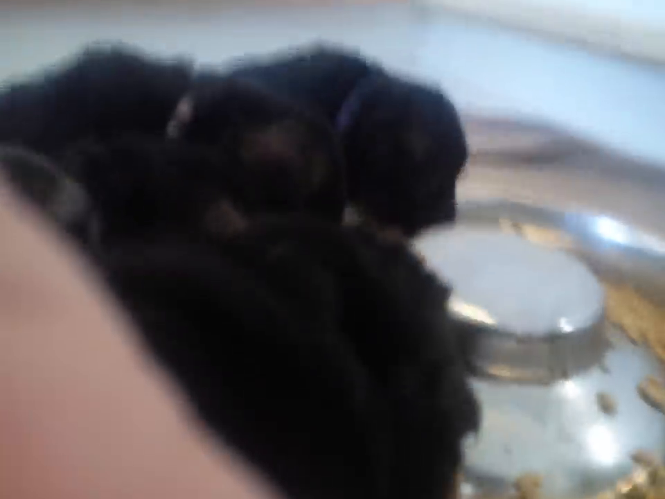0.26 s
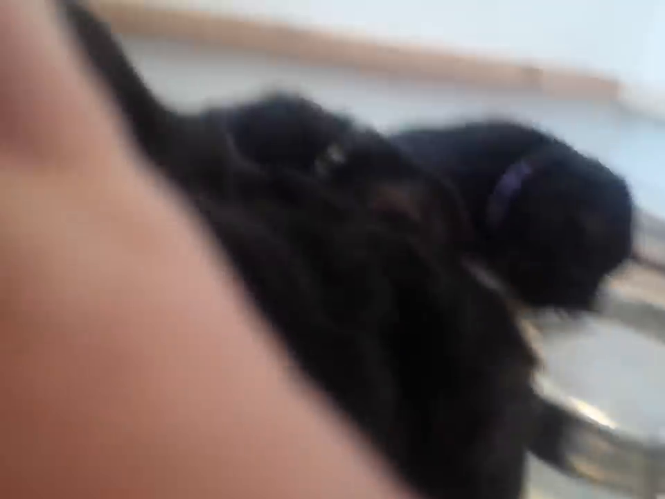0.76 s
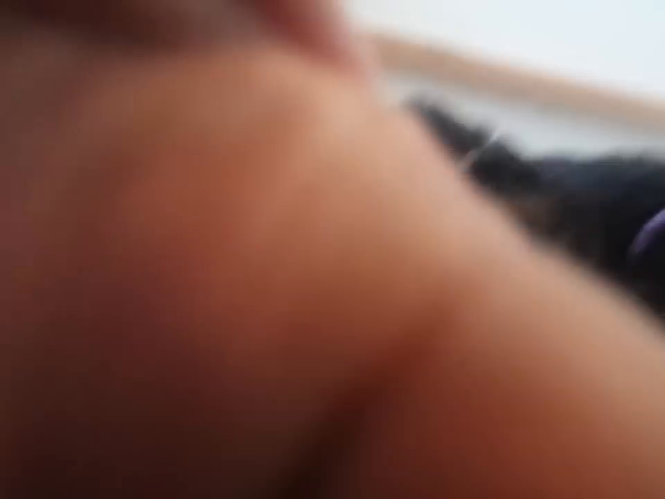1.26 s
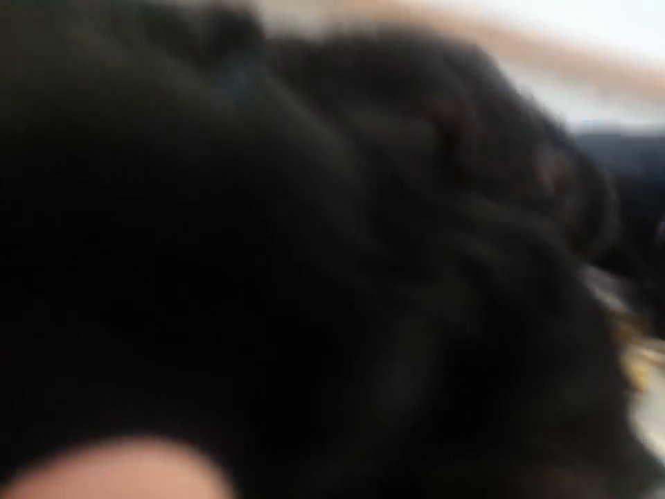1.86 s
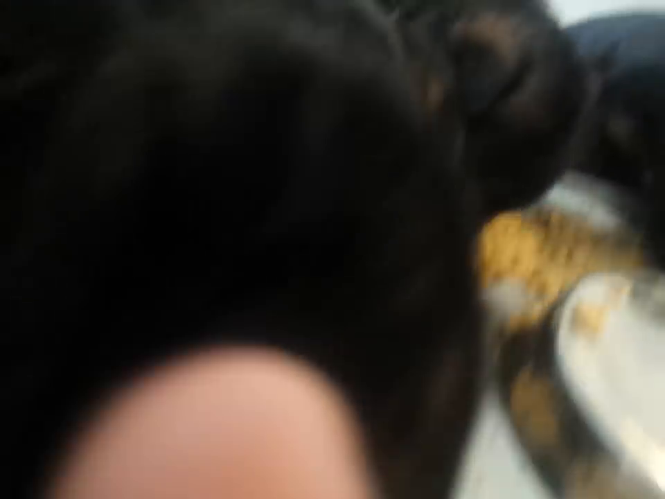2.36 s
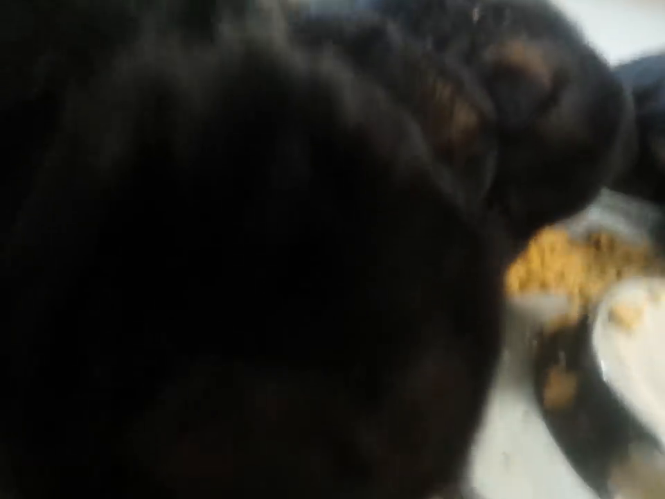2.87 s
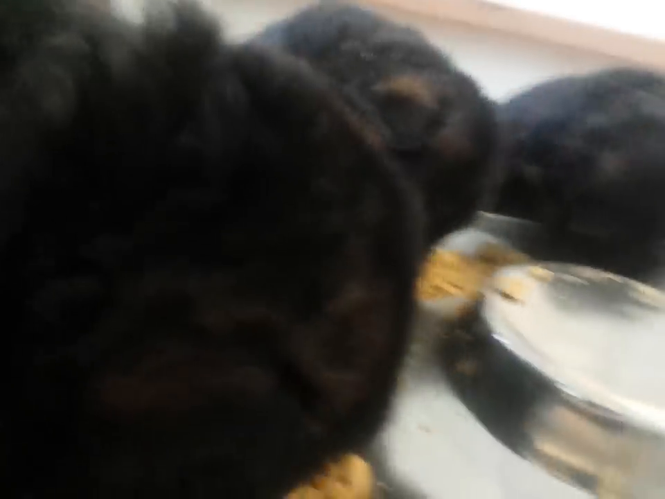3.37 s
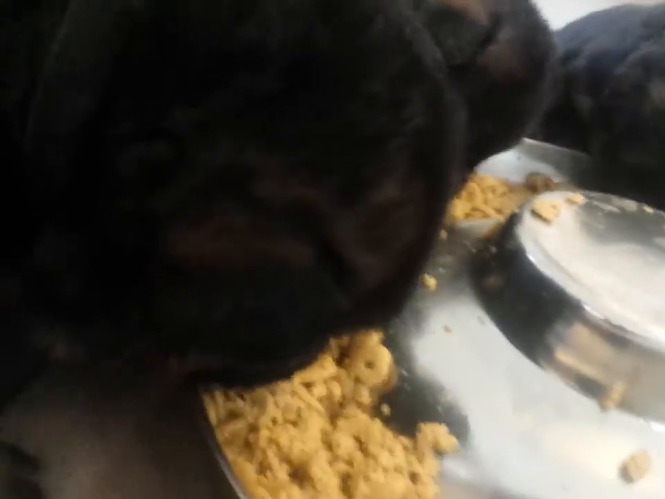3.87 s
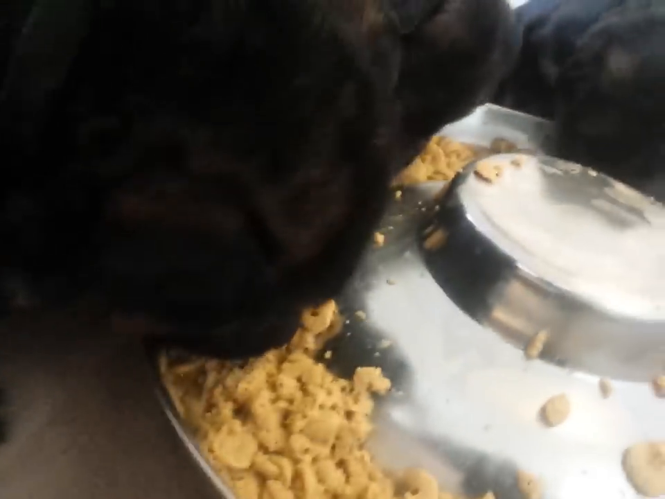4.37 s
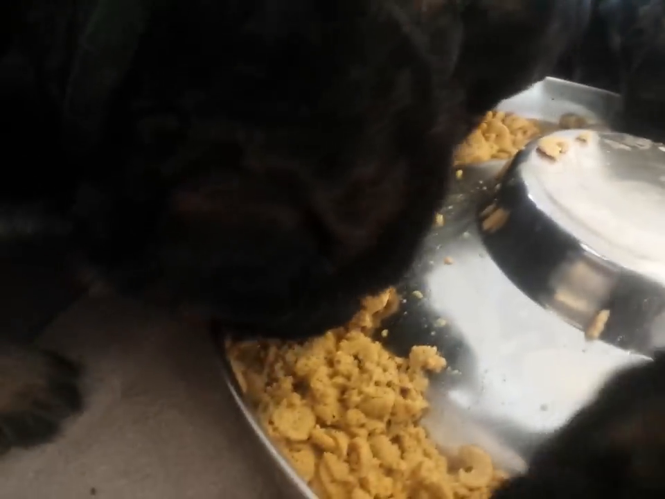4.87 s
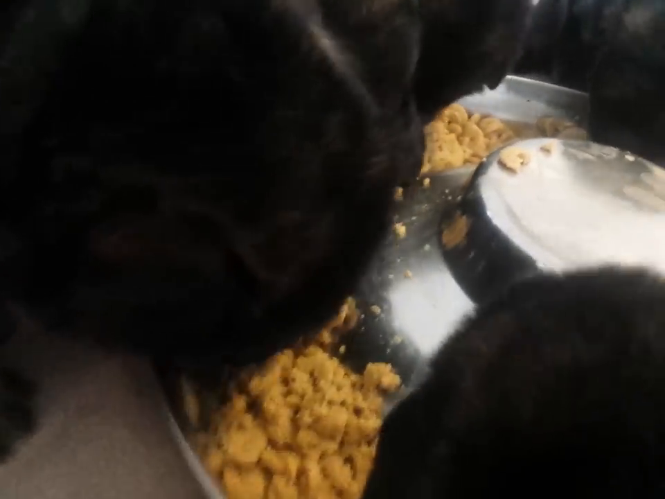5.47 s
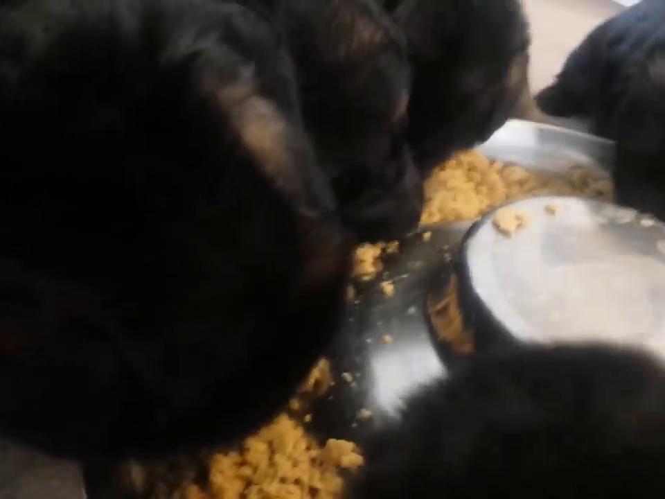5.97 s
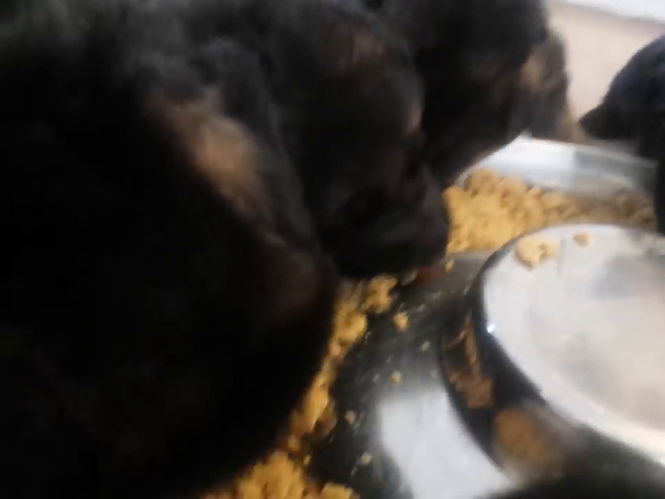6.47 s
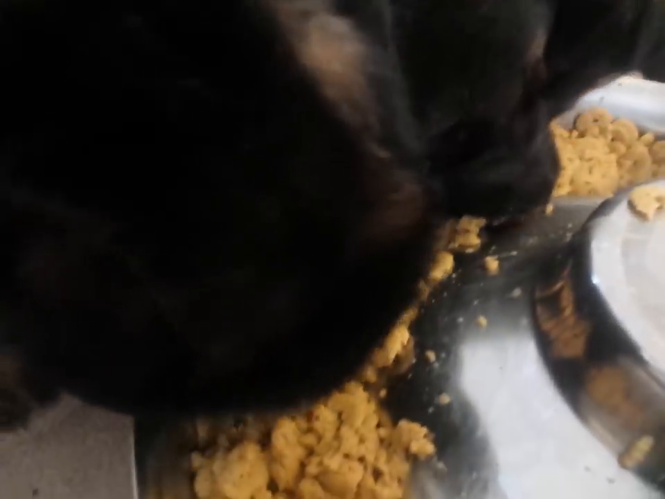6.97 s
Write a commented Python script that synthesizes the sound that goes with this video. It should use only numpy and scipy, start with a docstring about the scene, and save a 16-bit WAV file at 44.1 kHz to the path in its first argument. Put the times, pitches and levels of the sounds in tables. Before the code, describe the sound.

Close wet clicking and squelching of young dogs eating soaked kibble indoors, with fur and hand brushing the microphone and a few dull bumps.

```python
"""Wooden floor indoors, low room rumble: puppies eat soaked kibble from a steel pan near a hand-held phone.
Tongue clicks are damped rings with noise ticks; squelches are clumps of short wet pops.
Mash and a fine hiss are coloured noise with crackle; hand and fur brushing past are swelling noise strokes.
Low bumps, probably a hand knock, ring low modes. Each of two microphone ports adds its own treble resonance."""
import sys
import numpy as np
from scipy import signal
from scipy.io import wavfile
from scipy.ndimage import uniform_filter1d

SR = 44100
rng = np.random.default_rng(int(sys.argv[2]) if len(sys.argv) > 2 else 0)


def transcribe(u):
    """Save the signal u as a 16-bit wav file named by the first command-line argument.

    u: samples, shape (n,) or (channels, n), limited to [-1, 1]; the rate is SR.
    q: integer samples, one column per channel.
    """
    v = np.clip(np.atleast_2d(u).T, -1, 1)
    q = np.round(v * 32767).astype(np.int16)
    wavfile.write(sys.argv[1], SR, q)


N = 318843


def gain_of(db):
    """Decibels to amplitude gain."""
    return 10 ** (np.asarray(db) / 20)


def evened(x):
    """Scales to rms 1."""
    return x / np.sqrt(np.mean(x ** 2) + 1e-20)


def read(points, hz):
    """Interpolates a spectrum on a log frequency axis."""
    point_hz, value = np.transpose(points)
    return np.interp(np.log(hz + 1), np.log(point_hz + 1), value)


def along(rows, order):
    """Interpolates one column of a time curve at every sample."""
    rows = np.asarray(rows)
    return np.interp(np.arange(N) / SR, rows[:, 0], rows[:, order])


def add(mix, start_s, sound):
    """Adds a stereo sound at a time, cut at the end of the mix."""
    part = mix[:, max(round(start_s * SR), 0):][:, :sound.shape[1]]
    part += sound[:, :part.shape[1]]


# left-right likeness of noise: (frequency [Hz], correlation [0-1])
PORT_LIKENESS = [(30, .45), (125, .75), (250, .75), (600, .55), (1200, .1), (8000, 0)]


def noise(tone, size, patchy_db):
    """Coloured stereo noise, rms 1, with patches drifting in time and pitch; lows are shared by the ports."""
    frames = N // (size // 4) + 5
    hz = np.fft.rfftfreq(size, 1 / SR)
    a, b, c, d, patches = rng.standard_normal((frames, len(hz), 5)).T
    patches = uniform_filter1d(patches, size=8, axis=0)
    patches = evened(uniform_filter1d(patches, size=10, axis=1))
    same = np.clip(read(PORT_LIKENESS, hz), -1, 1)[:, None]
    left = a + 1j * b
    right = same * left + np.sqrt(1 - same ** 2) * (c + 1j * d)
    # outside the tone points the level falls off, by 90 dB at most
    below = np.maximum(tone[0][0] / (hz + 1), 1) - 1
    above = np.maximum(hz / tone[-1][0], 1) - 1
    edge_db = np.maximum(-40 * below - 40 * above, -90)
    colour_db = (read(tone, hz) + edge_db)[:, None] + patchy_db * patches
    spectra = np.array([left, right]) * gain_of(colour_db)
    return evened(signal.istft(spectra, nperseg=size, noverlap=size * 3 // 4)[1][:, :N])


def ping(hz, cycles, swell=0.11, size=400):
    """Damped ring, peak 1; decay and onset constants (cycles, swell) are in cycles of its pitch."""
    turns = np.arange(size) / SR * hz
    ring = np.sin(2 * np.pi * turns) * np.exp(-turns / cycles) * (1 - np.exp(-turns / swell))
    return ring / abs(ring).max()


def crackle(lo_hz, hi_hz, per_s, cycles, spread_db, count=12):
    """Small wet pops on a ladder of pitches, at random times, sizes and sides; rms 1."""
    out = np.zeros((2, N))
    for hz in np.geomspace(lo_hz, hi_hz, count):
        when, size, sign, side = rng.random((int(per_s / count * N / SR), 4)).T
        height = np.sign(sign - .5) * gain_of(-spread_db * np.log(size + 0.022))
        train = np.zeros((2, N))
        train[:, (when * N).astype(int)] = height * np.array([side, 1 - side])
        pop = signal.oaconvolve(train, ping(hz, cycles)[None], axes=1)[:, :N]
        lag = rng.integers(-12, 13)  # samples: the ports lie a few cm apart
        out += [pop[0], np.roll(pop[1], lag)]
    return evened(out)


# low room rumble, dipping after the loud click: (time [s], rms level [dB])
RUMBLE_LEVEL = [(0, -52.5), (1.4, -48.5), (1.83, -50.5), (3.15, -50), (3.3, -53), (3.9, -59.5), (4.3, -53),
                (5.1, -51), (5.45, -45.5), (6., -51), (7.23, -51.5)]
# room resonances: (frequency [Hz], relative level [dB per Hz])
RUMBLE_COLOUR = [(25, -26), (37, -16), (75, -7), (98, -6), (114, 4), (130, -20), (156, -3.5), (227, -2.5),
                 (340, -13), (377, -9), (509, -29.5), (687, -19.5), (900, -23.5), (1200, -47)]


def rumble():
    """Low noise in the resonances of the room."""
    return gain_of(along(RUMBLE_LEVEL, order=1)) * noise(RUMBLE_COLOUR, size=4096, patchy_db=1.2)


# low bumps: (time [s], level of the peak-normalised ring before the rise [dB],
# rise [s], t60 at 100 Hz [s], favoured pitch [Hz], loss away from it [dB per octave])
BUMPS = [(0.3083, -14.5, 0.0024, 0.19, 236, 5.5), (.338, -25.5, 0.0046, 0.5, 112, 6),
         (3.621, -23.5, 0.0033, 0.043, 330, 12), (5.582, -16, 0.0073, 0.16, 172, 38),
         (5.6, -32, 0.008, 0.31, 80, 19)]
# low modes: (frequency [Hz], relative level [dB])
BUMP_MODES = [(58, 9), (102, 8.5), (140, 6.5), (172, 6), (330, 4.5), (480, 4), (680, 6.5), (900, -4)]
FAR_PORT_GAIN = .88  # ring at the right port


def bumps():
    """A soft knock rings low modes, the higher dying first; rough handling noise, independent per port."""
    out, t = np.zeros((2, N)), np.arange(SR // 2) / SR
    rough_band = signal.butter(1, [90, 600], "band", fs=SR)
    roughs = signal.lfilter(*rough_band, rng.standard_normal((len(BUMPS), 2, len(t))))
    for (start_s, db, rise_s, t60_s, knock_hz, narrow_db), rough in zip(BUMPS, roughs):
        ring = np.zeros(len(t))
        for hz, mode_db in BUMP_MODES:
            struck_db = mode_db - narrow_db * abs(np.log2(hz / knock_hz))
            decay_db = 60 * t / t60_s * (hz / 100) ** 0.53
            ring -= gain_of(struck_db - decay_db) * np.sin(2 * np.pi * hz * t)
        both = np.array([ring, FAR_PORT_GAIN * np.roll(ring, 22)]) / abs(ring).max()  # right 0.5 ms later
        both += gain_of(-16.0 - narrow_db - 70 * t / t60_s) * evened(rough)
        onset = 1 - np.exp(-(t / rise_s) ** 2)
        add(out, start_s, gain_of(db) * onset * both)
    return out


# strokes of skin and fur near the ports: (loudest time [s], length [s],
# left level [dB], right level [dB], duller scrape level [dB])
BRUSH_STROKES = [(0.167, 0.092, -35, -44, -48.5), (0.327, 0.037, -36.5, -48, -64),
                 (0.376, 0.067, -34, -42, -49), (0.422, 0.1, -61, -43.5, -48.5),
                 (0.465, 0.12, -33.5, -53, -48), (0.673, 0.056, -59, -40, -49),
                 (0.745, 0.067, -49, -39.5, -63), (0.844, 0.13, -36, -43, -74),
                 (0.943, 0.16, -54, -43, -69), (1.036, 0.1, -62, -46.5, -53), (1.159, 0.087, -69, -39, -52),
                 (1.376, 0.17, -41, -40, -54), (1.665, 0.13, -41, -32, -51),
                 (2.002, 0.085, -50, -66, -45.5), (2.776, 0.21, -42.5, -40.5, -45),
                 (3.155, 0.29, -38.5, -40.5, -37), (3.29, 0.054, -49, -48, -50.5),
                 (3.617, 0.051, -51, -44.5, -65), (5.62, 0.36, -51, -49.5, -52.5),
                 (6.007, 0.059, -62, -47, -44.5)]
# stroke colour: (frequency [Hz], relative level [dB])
BRUSH_COLOUR = [(1500, -7.5), (3500, -7.5), (5000, 2.5), (8000, -2.5), (11000, 1), (14300, 10),
                (15100, -26)]
# scrape colour: (frequency [Hz], relative level [dB])
SCRAPE_COLOUR = [(50, 2), (120, -4), (250, 10), (500, -8), (1000, -0.5), (2000, 0), (3500, -3.5),
                 (5000, -1.5)]
RISE_SHARE = 0.58  # part of a stroke spent swelling


def brushes():
    """Hand and fur rub past the ports: noise swells and dies per stroke, with a lower scrape beneath."""
    t, level = np.arange(N) / SR, np.zeros((3, N))
    for top_s, length_s, *levels_db in BRUSH_STROKES:
        start_s, end_s = top_s - RISE_SHARE * length_s, top_s + (1 - RISE_SHARE) * length_s
        shape = np.interp(t, [start_s, top_s, end_s], [0, 1, 0])
        level += gain_of(levels_db)[:, None] * np.sin(np.pi / 2 * shape) ** 1.48
    rub = level[:2] * noise(BRUSH_COLOUR, size=256, patchy_db=2.5)
    scrape = level[2] * noise(SCRAPE_COLOUR, size=256, patchy_db=3.0)
    return rub + scrape


# slow levels of hiss and mash, also played by mash():
# (time [s], wet mash rms level [dB], fine hiss level before its trim [dB])
MASH_AND_HISS_LEVEL = [(0, -50.5, -47), (1., -52, -48), (1.55, -51, -45.5), (1.78, -55.5, -51.5),
                       (2.05, -52, -47.5), (2.45, -51, -47.5), (2.75, -49, -41), (3.0, -53, -41.5),
                       (3.3, -57.5, -44.5), (3.62, -51.5, -52), (3.7, -63, -52.5), (3.88, -61.5, -56),
                       (4., -65, -50.5), (4.4, -54, -52.5), (5., -51.5, -48), (6.6, -52.5, -48),
                       (6.95, -48, -44), (7.23, -49.5, -54)]
# hiss colour: (frequency [Hz], relative level [dB])
HISS_COLOUR = [(1000, -4), (3000, -4.5), (5000, -3.5), (8000, -5.5), (10000, -4), (12000, -2), (14300, 7),
               (15100, -24)]
HISS_TRIM_DB, SPIT_TRIM_DB = -5.0, -8.0  # spit is relative to the mash level


def fine_hiss():
    """A fine noise hiss, stronger early with the hand near; spit crackles on top, following the mash level."""
    hiss = noise(HISS_COLOUR, size=256, patchy_db=2.5)
    spit = crackle(3400, 9300, per_s=650, cycles=1.8, spread_db=5.5)
    hiss_gain = gain_of(along(MASH_AND_HISS_LEVEL, order=2) + HISS_TRIM_DB)
    spit_gain = gain_of(along(MASH_AND_HISS_LEVEL, order=1) + SPIT_TRIM_DB)
    return hiss_gain * hiss + spit_gain * spit


# mash colour: (frequency [Hz], relative level [dB])
MASH_COLOUR = [(300, -2), (500, 3.5), (720, -1.5), (1000, -3), (1700, 6), (2500, 0.5), (3500, -5),
               (6000, -6)]


def mash():
    """Tongues stir the soaked food: a soft wash with bubbles popping in it."""
    wash = noise(MASH_COLOUR, size=512, patchy_db=3.0)
    pops = crackle(700, 3600, per_s=330, cycles=2.4, spread_db=4.5)
    return gain_of(along(MASH_AND_HISS_LEVEL, order=1)) * evened(wash + gain_of(-4.5) * pops)


# mouths closing on food: (start [s], end [s], rms level [dB], centre pitch [Hz])
SQUELCH_CLUMPS = [(2.15, 2.23, -47.5, 1400), (2.368, 2.394, -52, 1860), (2.618, 2.672, -45, 1750),
                  (3.093, 3.216, -42, 4000), (3.97, 4.048, -49.5, 2820), (4.595, 4.648, -55, 4600),
                  (4.904, 4.966, -44, 3020), (5.068, 5.137, -49, 3650), (6.39, 6.428, -47, 1510),
                  (6.888, 6.907, -40, 2940), (6.981, 7.1, -53, 2560)]


def squelches():
    """Wet food squeezed in a mouth: pops about 1 ms apart, scattered in pitch, swelling and fading."""
    out = np.zeros((2, N))
    draws_per_clump = rng.random((len(SQUELCH_CLUMPS), 120, 5))
    for (start_s, end_s, db, hz), draws in zip(SQUELCH_CLUMPS, draws_per_clump):
        length_s = end_s - start_s
        clump = np.zeros((2, round(length_s * SR) + 400))
        when_s = np.cumsum(-.001 * np.log(draws[:, 0] + .01))
        for pop_s, (pitch, size, side, lag) in zip(when_s[when_s < length_s], draws[:, 1:]):
            ring = ping(hz * 2 ** (1.7 * (pitch - .5)), cycles=1.7)  # scatter 1.7 octaves wide
            arch = abs(np.sin(np.pi * pop_s / length_s)) ** .5
            pop = gain_of(-11. * size) * arch * ring
            add(clump, pop_s, np.array([side * pop, (1 - side) * np.roll(pop, int(16 * lag))]))
        add(out, start_s, gain_of(db) * evened(clump))
    return out


# clearest tongue clicks: (time [s], snap ring level [dB], snap pitch [Hz],
# mouth cavity ring peak [dB], cavity pitch [Hz], snap left minus right [dB])
TONGUE_CLICKS = [(0.1216, -24, 5060, -28.5, 2230, 6), (0.5227, -31, 6050, -59, 700, 14.5),
                 (0.5556, -33.5, 6200, -35, 2430, 10), (0.6656, -31, 6300, -40.5, 730, -0.5),
                 (1.014, -48, 5380, -38.5, 950, 6), (1.267, -50, 4500, -34, 1670, -3),
                 (1.3053, -22.5, 11200, -60, 770, -9.5), (1.5217, -55, 6960, -28.5, 1780, -13),
                 (2.114, -31.5, 5200, -37, 1640, -2), (2.1608, -52, 4000, -37, 1350, 0),
                 (2.166, -52, 4000, -38, 1800, 4), (2.176, -46, 3990, -27.5, 1610, 9),
                 (2.1864, -50, 4600, -34, 1400, -1), (2.194, -47, 5300, -29, 1750, 5),
                 (2.2119, -34, 5850, -26, 1420, 1), (2.2133, -30.5, 2730, -34, 1520, 8),
                 (2.2824, -32, 5600, -60, 1860, -1), (2.6348, -31.5, 5140, -26.5, 1250, 4),
                 (2.655, -35, 3440, -22, 2630, 5.5), (2.8437, -28.5, 5470, -40, 1000, 5.5),
                 (2.865, -38, 4560, -31.5, 2400, 0), (2.967, -28, 5630, -53, 860, -1),
                 (3.0477, -31, 5500, -31.5, 1660, 0), (3.1013, -23, 3200, -21.5, 2770, 7),
                 (3.2536, -7, 6060, -26, 2310, -6.5), (3.446, -36, 4500, -40, 1240, 10),
                 (3.4756, -27.5, 5900, -20.5, 2580, 4), (3.4756, -32, 4550, -37.5, 760, 6),
                 (3.5495, -30.5, 4700, -49, 865, 4), (3.5607, -39, 3520, -36.5, 1280, 6),
                 (3.569, -35, 6040, -60, 1500, 2.5), (3.925, -37, 5630, -46, 1270, 1),
                 (3.953, -39, 4100, -37, 1140, 5), (4.023, -35.5, 3800, -34, 1210, 3),
                 (4.073, -35, 7550, -47, 1660, -1), (4.0875, -39, 6360, -51, 1840, 3),
                 (4.1059, -36.5, 6170, -48, 1730, -1), (4.226, -37.5, 7600, -60, 1770, -9),
                 (4.487, -38, 5400, -35, 1870, 7), (4.5019, -35, 4130, -31.5, 1000, -2),
                 (4.5031, -30.5, 2650, -27, 2070, 7), (4.5366, -41, 5710, -33.5, 2310, 7),
                 (4.581, -34.5, 5300, -35, 1840, 7), (4.5998, -33.5, 6800, -52, 1500, -0.5),
                 (4.615, -32.5, 4840, -52, 1500, 8), (4.651, -29.5, 6700, -55, 1390, -1),
                 (4.67, -38, 4600, -51, 1500, 1), (4.6815, -31, 4100, -42, 880, 8),
                 (4.801, -28.5, 5760, -51, 877, -8), (4.855, -31, 7100, -62, 732, -10.5),
                 (4.8824, -33.5, 7400, -56, 2170, 0.5), (4.918, -34, 3800, -39, 1700, 7),
                 (4.9403, -36, 6060, -27, 1700, 10), (4.9767, -27, 5400, -33, 1480, 5),
                 (5.016, -29.5, 6500, -33.5, 2920, 5), (5.07, -33, 4860, -26.5, 2200, 8),
                 (5.094, -31, 4970, -43, 2200, 1.5), (5.156, -31, 6760, -60, 1500, -3.5),
                 (5.2727, -31.5, 5940, -44, 2200, 0), (5.3116, -27.5, 4830, -37, 1240, 6),
                 (5.3266, -35, 5040, -41, 1160, 1), (5.4443, -35, 4170, -44, 2000, -4.5),
                 (5.4561, -32.5, 7610, -50, 2000, 2), (5.499, -31.5, 4820, -48, 750, -4),
                 (5.5328, -35, 5060, -41, 734, -1), (5.566, -24.5, 5560, -40, 2270, -4.5),
                 (5.693, -24.5, 7060, -39.5, 800, -2.5), (5.832, -31, 5540, -57, 1500, -1.5),
                 (5.895, -33.5, 4460, -38, 750, -8.5), (6.061, -28.5, 5400, -53, 1810, -1),
                 (6.0836, -26.5, 4900, -43, 764, -3), (6.1665, -30, 5230, -36.5, 1820, -0.5),
                 (6.364, -26, 8440, -60, 1730, 2), (6.405, -40, 2190, -39, 720, 4),
                 (6.563, -24.5, 6760, -30.5, 1980, 4), (6.6372, -31, 5550, -55, 2380, 4),
                 (6.6463, -26, 4170, -53, 3034, -1), (6.7117, -27, 5550, -37.5, 1770, -1),
                 (6.7768, -36, 4540, -35, 880, 5), (6.88, -26.5, 5600, -33.5, 1940, -1.5),
                 (6.887, -25.5, 6860, -31, 2500, 0.5), (6.892, -29, 4270, -34, 1300, -2),
                 (6.9094, -19, 3860, -29.5, 1170, -2), (6.9554, -36, 5010, -30, 1840, -7),
                 (6.96, -33, 4500, -30, 1910, -4), (7.0814, -29, 4500, -40, 2190, 0),
                 (7.12, -32, 3300, -42, 2990, 6), (7.1579, -25.5, 5330, -36, 3620, 2),
                 (7.1668, -26.5, 4150, -50, 2600, 2), (7.198, -28, 5640, -34, 2420, 1),
                 (7.2173, -33.5, 3520, -31, 1150, 6)]
SOFT_DB, FIRM_DB = -24, -16  # snap levels counted as soft and as fully firm
SOFT_CYCLES, FIRM_CYCLES, FIRM_HZ = 1.7, 6, 3900  # decay in cycles, both referred to FIRM_HZ
MOUTH_CYCLES, SWELL_CYCLES = 1.4, 1.2  # cavity decay; extra onset of a fully firm snap


def clicks():
    """Tongue leaves palate: tick, snap (overtone if firm), wet fizz and mouth ring; low snaps ring longer."""
    out, t = np.zeros((2, N)), np.arange(400) / SR
    fizzes = rng.standard_normal((len(TONGUE_CLICKS), 2, 400))
    chance = rng.random(len(TONGUE_CLICKS))
    for (start_s, db, hz, mouth_db, mouth_hz, side_db), wet, lag in zip(TONGUE_CLICKS, fizzes, chance):
        firm = np.clip((db - SOFT_DB) / (FIRM_DB - SOFT_DB), 0, 1)
        soft_cycles = SOFT_CYCLES * max(FIRM_HZ / hz, 1) ** 2
        firm_cycles = FIRM_CYCLES * (FIRM_HZ / hz) ** 3
        cycles = soft_cycles + firm * (firm_cycles - soft_cycles)
        bright = np.diff(wet, prepend=0)
        wetness = 1 - .5 * firm
        tick = bright * (np.exp(-t / 0.00013) + 0.31 * wetness * np.exp(-t / 0.0027))  # tick, then fizz
        ring = ping(hz, cycles, swell=.5 + firm * SWELL_CYCLES)
        overtone = 1.2 * firm * ping(2 * hz, cycles)
        snap = gain_of(db) * (ring + overtone + 0.73 * wetness * tick)
        mouth = gain_of(mouth_db) * ping(mouth_hz, MOUTH_CYCLES, swell=0.23)
        both = snap * gain_of([[side_db / 2], [-side_db / 2]]) + mouth
        # in samples: the quieter port tends to hear it later; 10 leaves room for a lead
        both[1] = np.roll(both[1], round(.4 * side_db + 3 * (lag - .5)) + 10)
        both[0] = np.roll(both[0], 10)
        add(out, start_s + .0003, both)
    return out


def scene():
    """All sources at the microphone."""
    return rumble() + bumps() + brushes() + fine_hiss() + mash() + squelches() + clicks()


# treble response of the left and the right port: (frequency [Hz], gain [dB])
PORT_TREBLE = [
    [(2000, 1.5), (4000, 6.5), (5600, 12), (7000, 4.5), (9000, 0.5), (12000, -11), (15000, -25.5)],
    [(2000, 1.5), (4000, 2), (5600, 5), (7200, 13), (9000, 5), (12000, -4), (14500, -19)],
]
LIMIT_DB, RECOVERY_DB_PER_S = -14.5, 860.0
CLIP_LEVEL, EDGE_HZ = .75, 15500


def record(dry):
    """Minimum-phase port treble, a limiter ducking briefly after loud peaks, soft clipping, low-pass."""
    hz = abs(np.fft.fftfreq(2048, 1 / SR))
    log_gain = np.log(gain_of([read(port, hz) for port in PORT_TREBLE]))
    response = np.exp(log_gain - 1j * signal.hilbert(log_gain).imag)
    taps = np.fft.ifft(response).real[:, :1024]
    heard = signal.oaconvolve(dry, taps, axes=1)[:, :N]
    peak_db = 20 * np.log10(abs(heard).max(0) + 1e-9)
    fall_db = np.arange(N) * RECOVERY_DB_PER_S / SR
    held_db = np.maximum.accumulate(peak_db + fall_db) - fall_db
    over_db = np.maximum(held_db - LIMIT_DB, 0)
    late_db = np.roll(uniform_filter1d(over_db, size=41, origin=20), 40)  # full reaction takes about 2 ms
    ducked = heard / gain_of(late_db)
    clipped = CLIP_LEVEL * np.tanh(ducked / CLIP_LEVEL)
    edge = signal.firwin(255, EDGE_HZ, window=("kaiser", 9), fs=SR)
    return signal.oaconvolve(clipped, edge[None], "same")


dry = scene()
out = record(dry)
transcribe(out)
```